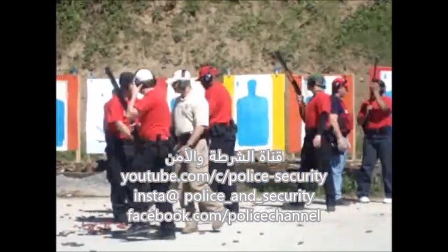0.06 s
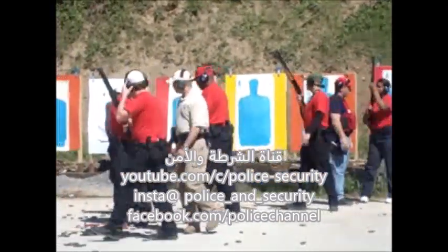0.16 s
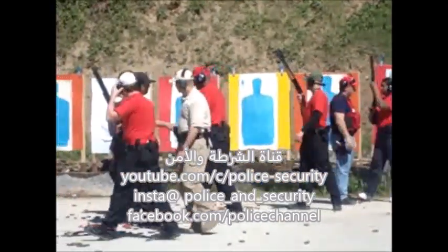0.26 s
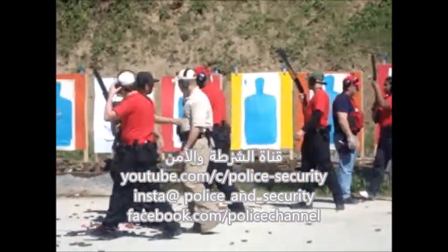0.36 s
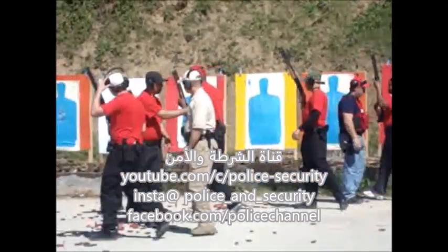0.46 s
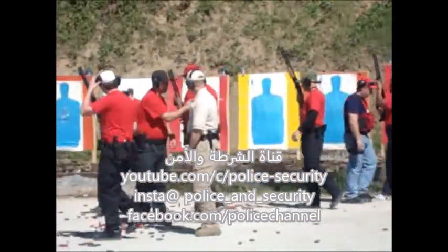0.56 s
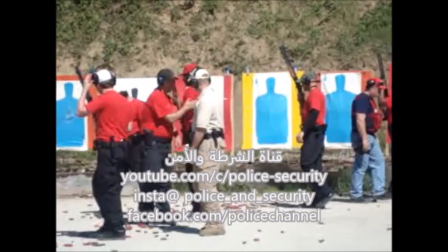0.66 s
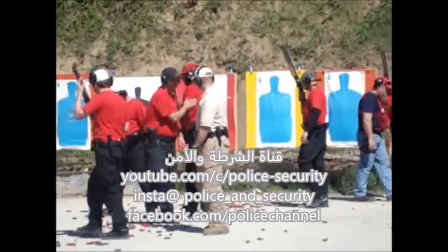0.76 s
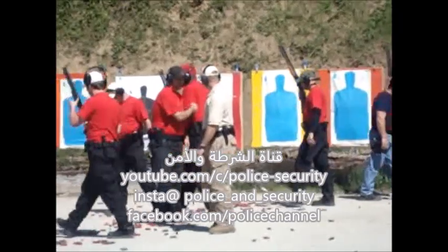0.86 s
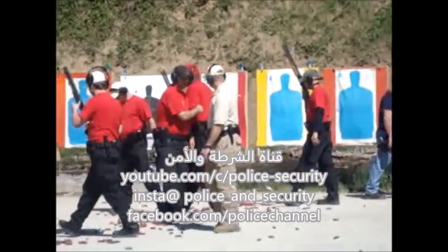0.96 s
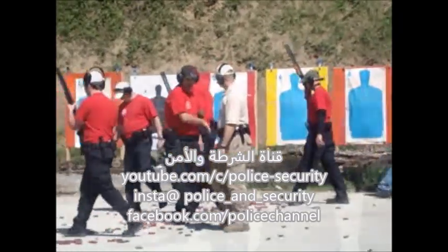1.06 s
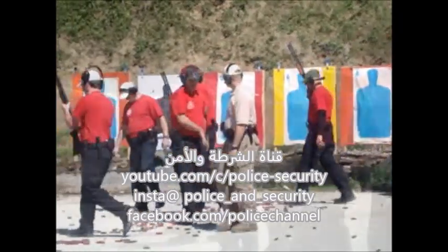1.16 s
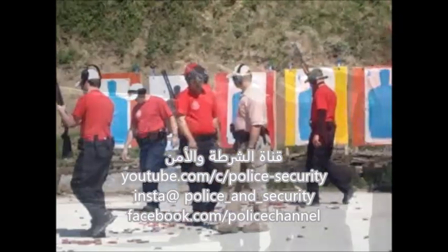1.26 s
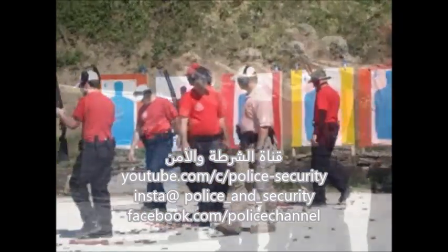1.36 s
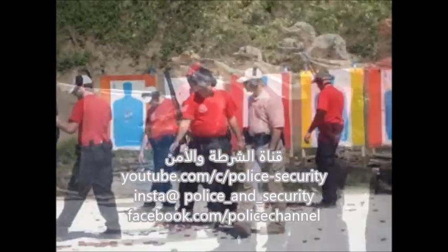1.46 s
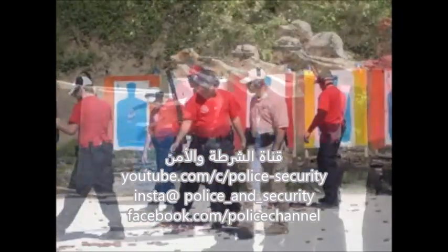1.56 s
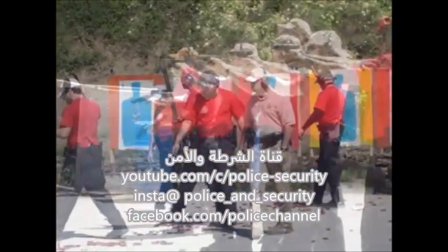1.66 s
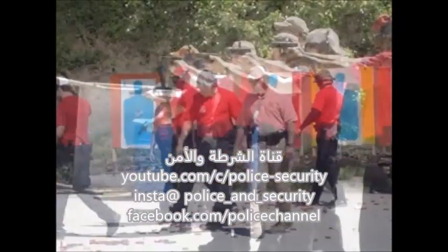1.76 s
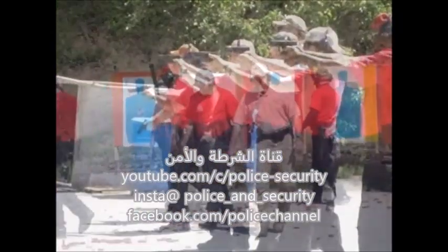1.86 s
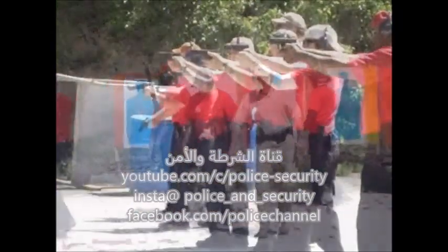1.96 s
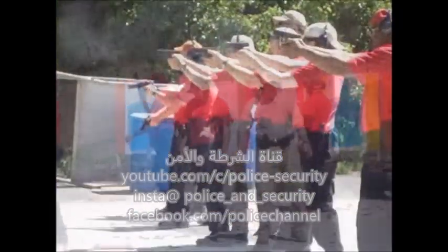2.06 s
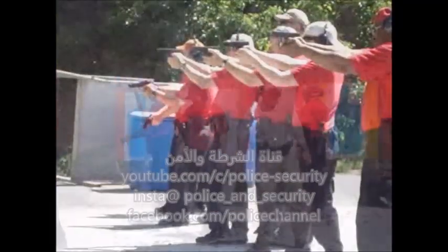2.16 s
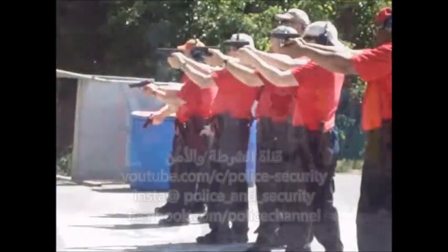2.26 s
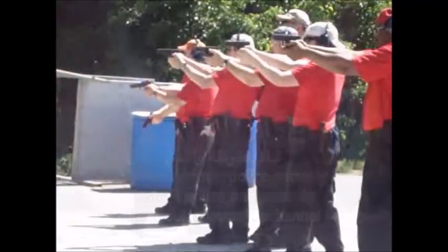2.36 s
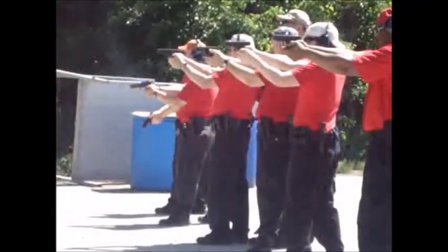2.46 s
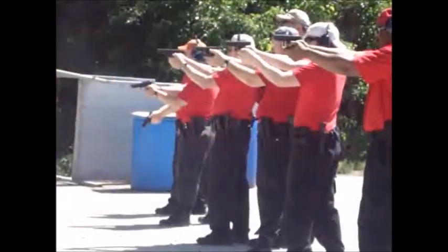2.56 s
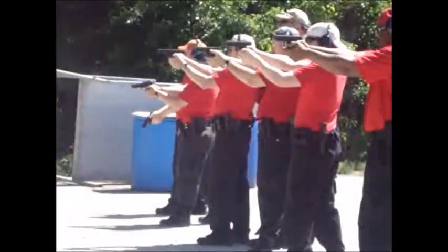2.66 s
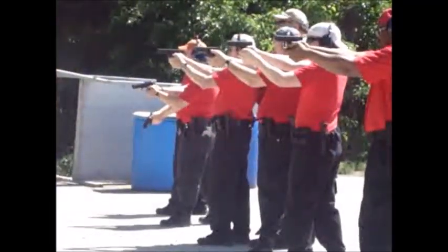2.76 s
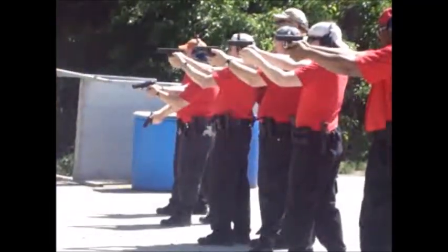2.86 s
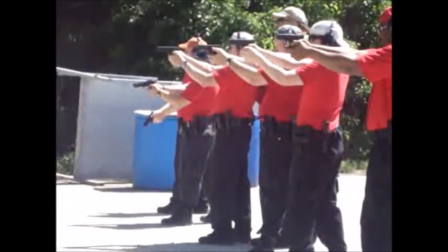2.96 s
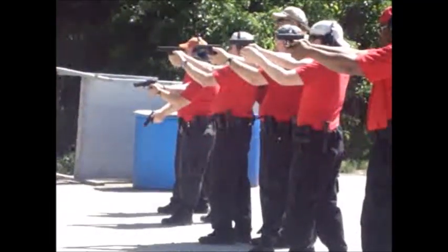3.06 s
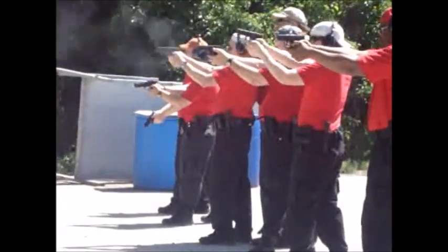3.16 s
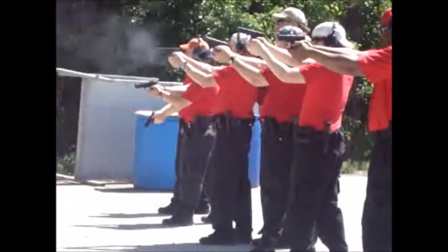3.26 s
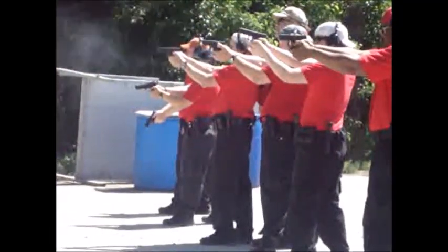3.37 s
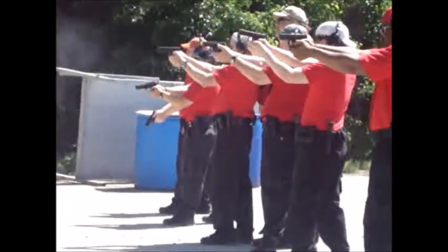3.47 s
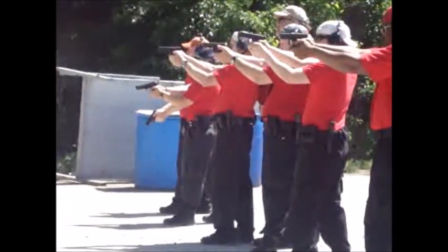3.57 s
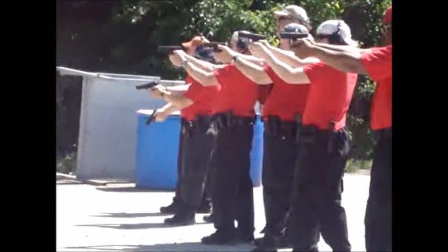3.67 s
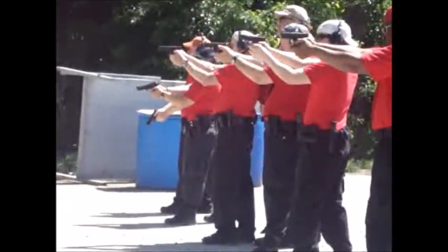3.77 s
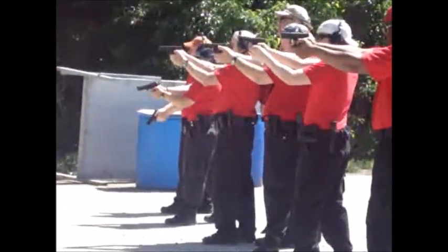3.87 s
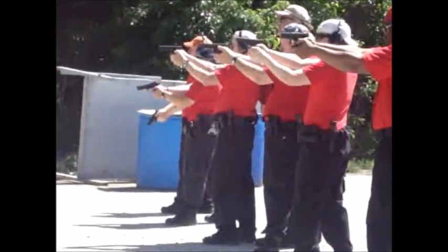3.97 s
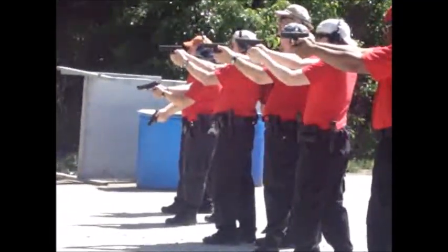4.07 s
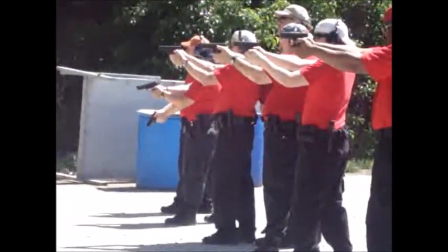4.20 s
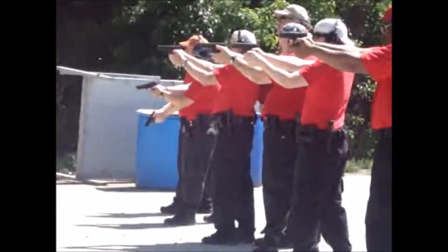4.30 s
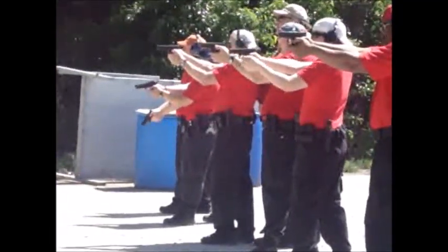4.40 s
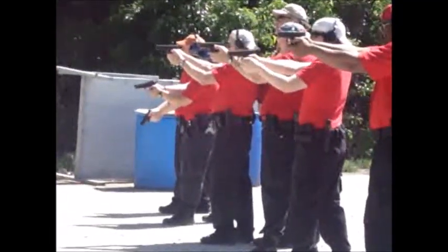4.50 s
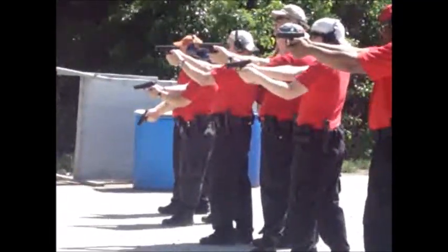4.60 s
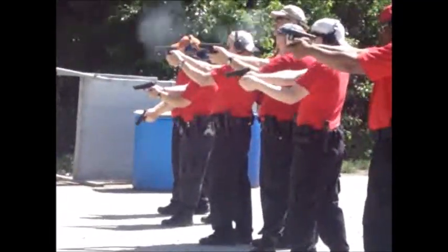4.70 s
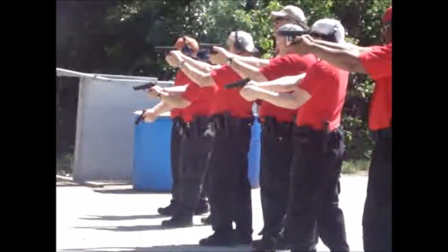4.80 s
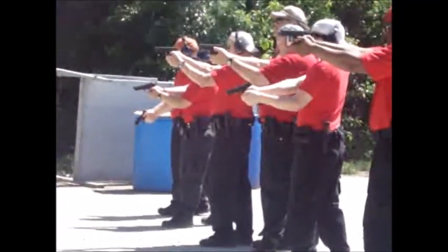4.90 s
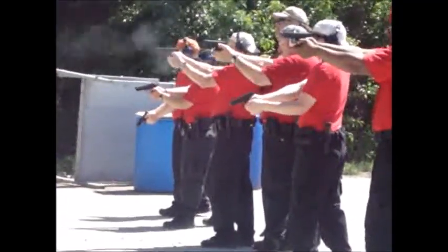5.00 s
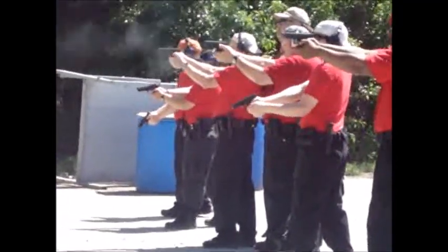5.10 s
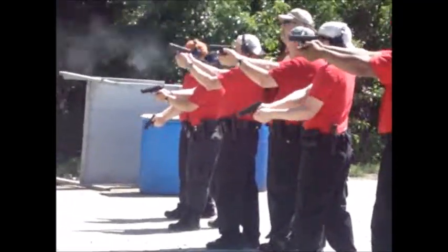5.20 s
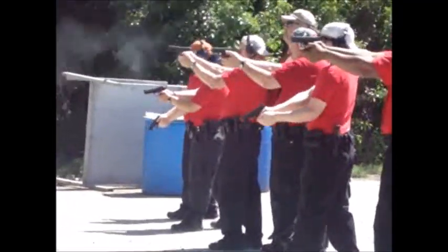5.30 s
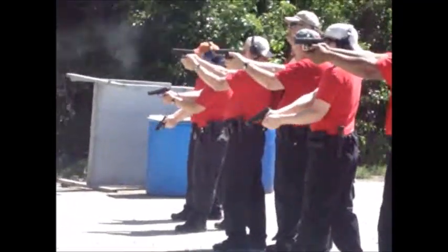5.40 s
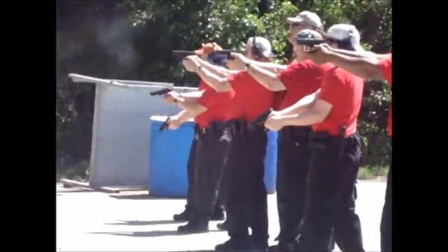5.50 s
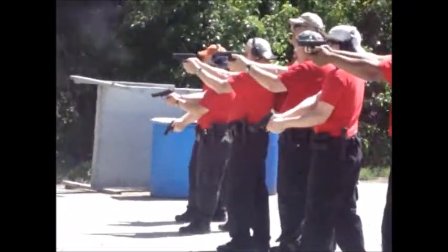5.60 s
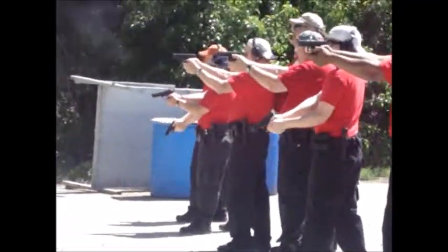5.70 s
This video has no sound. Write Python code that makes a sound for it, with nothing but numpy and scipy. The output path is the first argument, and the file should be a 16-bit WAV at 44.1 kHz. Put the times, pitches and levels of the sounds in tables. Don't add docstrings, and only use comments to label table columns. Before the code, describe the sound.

An outdoor shooting range heard through a small camera microphone. Metal clinks and dull knocks sit over steady traffic wash, with one far pistol shot swelling into echo. A loud shot lands just before the place changes to a quieter firing line, where a quick pair and later three spaced shots crack, slap off walls and trail away. A faint distant horn sounds between them.

```python
import sys
import numpy as np
from scipy import signal
from scipy.fft import dct
from scipy.io import wavfile
from scipy.ndimage import uniform_filter1d

SR = 44100
rng = np.random.default_rng(int(sys.argv[2]) if len(sys.argv) > 2 else 0)


def field_ratio(decibels):
    return 10 ** (np.asarray(decibels, dtype=float) / 20)


def dump_mix(stems):
    frames = np.atleast_2d(stems).T
    limited = np.clip(frames, -1, 1)
    pcm = np.round(limited * 32767).astype(np.int16)
    wavfile.write(sys.argv[1], SR, pcm)


N = 253342
CUT_S = 2.46
EDGE_HZ = 10040


def evened(x):
    return x / np.sqrt(np.mean(abs(x) ** 2) + 1e-20)


def read(points, hz):
    f, value = np.transpose(points)
    return np.interp(np.log(hz + 1), np.log(f + 1), value)


def add(mix, s, sound):
    part = mix[round(s * SR):][:len(sound)]
    part += sound[:len(part)]


def resonate(x, hz, width):
    turn = np.exp(2j * np.pi * np.cumsum(hz * np.ones(len(x))) / SR)
    r = np.exp(-np.pi * width / SR)
    return 2 * (turn * signal.lfilter([1 - r], [1, -r], x / turn + 1e-18)).real


# (time [s], peak level [dB], level of both wall slaps [dB], far-wall delay [s])
SHOTS = [
    (2.0954, -2, -1, .0376),
    (3.1531, -1, 0, .0406),
    (3.2734, 0, 0, .0391),
    (4.7744, -2, -1, .0427),
    (5.0268, -2, 0, .0391),
    (5.2482, 0, -4, .0378),
]
# (time [s], peak level [dB])
STRAYS = [
    (2.1555, -3),
    (3.2046, -4),
    (4.7870, -4),
    (4.8511, -6),
    (5.0905, -8),
]
# (level [dB], pressure step [ms], ground bounce [dB], limiter pull [dB])
DIRECT, NEAR_SLAP = (0, .065, -3, 3), (1, .14, -4, 12)
FAR_SLAP, STRAY_SLAP = (1, .1, -5, 7), (0, .12, -5, 10)


def arrivals():
    near_wall_s, pull_per_db = .0216, 0.72
    cracks = [(s, db, STRAY_SLAP) for s, db in STRAYS]
    for s, db, slap_db, far_wall_s in SHOTS:
        cracks.append((s, db, DIRECT))
        cracks.append((s + near_wall_s, slap_db, NEAR_SLAP))
        cracks.append((s + far_wall_s, slap_db, FAR_SLAP))
    rows = []
    for s, db, (own_db, ms, bounce_db, pull_db) in cracks:
        rows.append((s, db + own_db, ms, bounce_db, pull_db + pull_per_db * db))
    return rows


# (frequency [Hz], width [Hz], level [dB])
MIC_BODY = [
    (860, 320, 8),
    (1900, 1200, 5),
    (5000, 4000, -5),
]


def blast(db, ms, bounce_db):
    u = np.arange(600) / SR / (ms * 0.00091)
    step = -(1 - u) * np.exp(-u) * np.minimum(2 * u, 1)
    slow = np.exp(-u / 2)
    step -= step.sum() * slow / slow.sum()
    heard = .5 * step + sum(field_ratio(g) * resonate(step, f, w) for f, w, g in MIC_BODY)
    dull = uniform_filter1d(heard[:400], size=8)
    for delay_s, loss_db in (.0012, 0), (.0035, -3):
        add(heard, delay_s, field_ratio(bounce_db + loss_db) * dull)
    heard = signal.lfilter(*signal.butter(2, 80, "high", fs=SR), heard)
    return field_ratio(db + 2.5) * heard / abs(heard).max()


def ducking():
    loss_db, t = np.zeros(N), np.arange(2000) / SR
    for s, *_, db in arrivals():
        add(loss_db, s + .0008, db * np.exp(-(t / .009) ** 2))
    return field_ratio(-uniform_filter1d(loss_db, size=30))


# (time after the shot [s], level [dB])
WALL_SPRAY = [
    (.0226, 8),
    (.0405, 8),
]


def banks_db(t, near):
    spray = sum(db * (t > s) * np.exp(-((t - s) / 0.0091) ** 2) for s, db in WALL_SPRAY)
    spray = spray * np.clip(near * 8, 0, 0.75)
    return 6.5 + spray - 13 * np.maximum(t - 0.32, 0)


# (time [s], level [dB], nearness [0-1], bite near 3.5 kHz [dB], ring-time factor [1])
TAILS = [
    (1.071, -13.5, 0, 5.5, 0.95),
    (2.094, -17, .17, 0.1, 1.203),
    (3.152, -19, 0.97, -0.5, 1.06),
    (3.273, -25.5, 1, 1.5, 1.355),
    (4.773, -19.5, 0.96, 0.5, 1.2),
    (4.905, -33.5, .17, -3.5, 0.56),
    (5.026, -22, 0.7, -0.2, 1.15),
    (5.247, -24.5, 0.96, 4.5, 1.204),
]
# (frequency [Hz], density [dB per Hz])
TAIL_COLOUR = [(18, -72), (30, -50), (202, -34), (239, -24), (291, -18.5), (606, -1.5), (668, -3),
               (833, -1.5), (1170, -3.5), (1460, -13.5), (1960, -14), (2900, -14), (5210, -13), (9590, -23),
               (10300, -30.5), (13400, -71.5), (22000, -120)]
# (frequency [Hz], 60 dB decay [s])
RING = [(60, .5), (200, 0.57), (800, 1.04), (2000, 1.005), (4000, 0.82), (8000, 0.67)]


def tail(db, near, bite_db, ring):
    hz, t = np.fft.rfftfreq(512, 1 / SR)[:, None], np.arange(520) * 128 / SR
    a, b, clumps = rng.standard_normal((520, 257, 3)).T
    clumps = evened(uniform_filter1d(uniform_filter1d(clumps, size=16, axis=0), size=2, axis=1))
    rise_s = .0035 + 0.045 * np.exp(-near / 0.082)
    treble_db = 1.5 + 2 * near
    thump_db = -15 + 30 * near
    tone_db = treble_db * np.clip(np.log2(hz / 1300 + .01), 0, 1)
    tone_db = tone_db + thump_db * (hz < 260) * np.exp(-t / .05)
    tone_db += bite_db * np.exp(-np.log2(hz / 3600 + .01) ** 2 / .4)
    decay_db = 60 * t / (ring * read(RING, hz))
    colour = evened(field_ratio(read(TAIL_COLOUR, hz)))
    z = (a + 1j * b) * colour * field_ratio(tone_db - decay_db + 2.06 * clumps)
    x = signal.istft(z, nperseg=512, noverlap=384)[1]
    x = signal.lfilter(*signal.butter(2, 65, "high", fs=SR), x)
    t = np.arange(len(x)) / SR
    start = np.minimum(t / rise_s, 1) ** 0.59
    return field_ratio(db + banks_db(t, near)) * start * x / np.sqrt(np.mean(x[:2000] ** 2))


# (time [s], peak level [dB], frequency [Hz], 60 dB decay [s])
CLINKS = [(0.0054, -24.5, 4550, 0.02), (0.045, -37, 4300, 0.02), (0.0857, -47, 4500, 0.02),
          (0.558, -30.5, 5830, 0.029), (1.0535, -21, 6200, 0.025), (1.0598, -13.5, 4700, 0.014),
          (1.712, -27, 4060, 0.032), (1.7918, -38, 6000, 0.02), (1.8135, -32, 4400, 0.052),
          (1.8512, -24.5, 4300, 0.018), (1.8584, -30, 4220, 0.024), (1.8826, -35, 4450, 0.02),
          (1.9096, -24.5, 4450, 0.014), (1.9174, -37, 5800, 0.02), (1.9517, -33, 4500, 0.025),
          (4.2033, -29, 5470, 0.011), (4.2244, -46, 3950, 0.02), (4.3216, -42, 4800, 0.016),
          (4.3485, -41, 4040, 0.02)]


def clink(db, hz, t60):
    t = np.arange(3000) / SR
    scrape = rng.standard_normal(3000) * np.exp(-t / 0.0019)
    modes = ((1.001, 21.5), (1.12, 1), (1.37, 11), (1.55, -19), (1.85, -21))  # (ratio, dB)
    ring = sum(field_ratio(g) * evened(resonate(scrape, hz * k, 4.7 / t60)) for k, g in modes)
    ring += 1.2 * evened(resonate(scrape, 5500, 3000))
    return field_ratio(db) * ring / abs(ring).max()


# (time [s], peak level [dB], frequency [Hz], 60 dB decay [s])
KNOCKS = [
    (0.549, -22, 820, 0.051),
    (1.803, -20.5, 740, 0.017),
    (1.871, -17, 750, 0.034),
    (1.889, -43, 696, 0.03),
    (3.951, -32, 611, 0.03),
    (4.018, -35, 748, 0.025),
]


def knock(db, hz, t60):
    blow = rng.standard_normal(3000) * np.exp(-np.arange(3000) / SR / 0.0018)
    ring = resonate(resonate(blow, hz, 7.1 / t60), hz, 500)
    return field_ratio(db) * ring / abs(ring).max()


# (time [s], length [s], start frequency [Hz], end frequency [Hz], top level [dB])
ROLLS = [
    (1.905, .15, 8200, 7900, -50),
    (4.5, .24, 7950, 8050, -61),
    (0, .13, 4450, 4430, -48),
    (1.85, .1, 4300, 4200, -43),
]


def roll(length, start_hz, end_hz, db):
    t = np.arange(0, 1, 1 / (length * SR))
    hz = start_hz + (end_hz - start_hz) * t
    arch_db = np.interp(t, [0, 0.26, 1], [-14, 0, -14])
    noise = rng.standard_normal(SR)[:len(t)]
    return field_ratio(db + arch_db) * evened(resonate(resonate(noise, hz, 250), hz, 250))


# (time [s], length [s], level [dB])
HORN = [
    (2.929, .3, -42.5),
    (4.05, .8, -43),
]


def horn(start, length, db):
    release_s = .1
    t = np.arange(0, length + release_s, 1 / SR)
    release = np.clip((length + release_s - t) / release_s, 0, 1)
    swell = np.minimum(t / 0.56, 1) ** 0.85 * release
    octave = field_ratio(-4) * np.clip((t - 0.32) / .2, 0, 1)
    turns = 2 * np.pi * 398 * t
    waver = field_ratio(evened(uniform_filter1d(rng.standard_normal(SR), size=2000)))[:len(t)]
    return np.sqrt(2) * waver * field_ratio(db) * swell * (np.sin(turns) + octave * np.sin(2 * turns))


# (frequency [Hz], level [dB], start [s], end [s])
HUM = [
    (167, -69, 2.55, 3.2),
    (167, -73, 4.0, 4.8),
    (195, -59, 0, 2.45),
]


def hum(hz, db, start, end):
    noise = rng.standard_normal(3 * SR)[:round((end - start) * SR)]
    line = evened(resonate(resonate(noise, hz, 12), hz, 12))
    return start, field_ratio(db) * line * signal.windows.tukey(len(noise), .15)


def wash(colour, times, level_db, patchy_db):
    frames, hz = N // 256 + 5, np.fft.rfftfreq(1024, 1 / SR)
    a, b, patches = rng.standard_normal((frames, 513, 3)).T
    patches = evened(uniform_filter1d(uniform_filter1d(patches, size=9, axis=0), size=12, axis=1))
    z = (a + 1j * b) * field_ratio(read(colour, hz)[:, None] + patchy_db * patches)
    level = field_ratio(np.interp(np.arange(N) / SR, times, level_db))
    return level * evened(signal.istft(z, nperseg=1024, noverlap=768)[1][:N])


def since_shot():
    t = np.arange(0, 6, .005)
    shots = np.array([0] + [row[0] for row in SHOTS])
    return t, t - shots[np.searchsorted(shots, t, "right") - 1]


# (frequency [Hz], density [dB per Hz])
ROAD = [(15, -65), (25, -44), (86, -23.5), (113, -13.5), (165, -14), (188, -11), (288, -13), (514, -8.5),
        (851, -1), (1150, -7.5), (2580, -26), (6080, -32), (6720, -35.5), (9570, -39), (10300, -38),
        (13400, -67), (22000, -120)]
# (time [s], level [dB])
ROAD_DB = [(0, -33.5), (1.0, -35), (1.6, -33), (2.2, -32.5), (2.455, -40)]


def road():
    t, _ = since_shot()
    level_db = np.interp(t, *np.transpose(ROAD_DB)) - 60 * (t > CUT_S)
    return wash(ROAD, t, level_db, patchy_db=0.5)


# (frequency [Hz], density [dB per Hz])
FIELD = [(150, -51), (250, -44.5), (347, -11.5), (438, -5), (528, -7.5), (732, -3), (1150, -8), (1980, -18),
         (3580, -23.5), (4670, -25.5), (10300, -31.5), (13400, -57), (22000, -120)]


def field():
    t, since = since_shot()
    level_db = -47.5 + 2.5 * since + 7.5 * np.exp(-since / 0.29)
    level_db -= 0.5 * np.maximum(1 - (t - CUT_S) / 0.15, 0)
    return wash(FIELD, t, level_db, patchy_db=.8)


# (frequency [Hz], density [dB per Hz])
RUMBLE = [(15, -47), (25, -29.5), (108, -1.5), (135, -11), (162, -2), (194, -8.5), (300, 2.5), (390, -27),
          (660, -120)]


def rumble():
    t, since = since_shot()
    level_db = -77.5 + 15 * since - 60 * (t < CUT_S + 0.089)
    return wash(RUMBLE, t, level_db, patchy_db=5.0)


def scene():
    mix = road() + rumble() + field()
    for s, *row in TAILS:
        add(mix, s, tail(*row))
    mix *= ducking()
    for s, *row, _ in arrivals():
        add(mix, s, blast(*row))
    for rows, source in (CLINKS, clink), (KNOCKS, knock), (ROLLS, roll):
        for s, *row in rows:
            add(mix, s, source(*row))
    for row in HORN:
        add(mix, row[0], horn(*row))
    for row in HUM:
        add(mix, *hum(*row))
    return mix[None]


# (attack time [s], lowest frequency lost [Hz], loss [dB])
BRACES = [
    (1.0514, 5300, 18),
    (2.0, 5000, 24),
    (3.1515, 2000, 35),
    (4.2033, 4200, 12),
    (4.7725, 1500, 20),
    (5.0268, 6000, 19),
    (5.2482, 4500, 22),
]


def starved():
    lead_s, brace_s = .004, .019
    ahead = [(s - lead_s - brace_s, s - lead_s, hz, db) for s, hz, db in BRACES]
    behind = [(s + .004, s + .012, 5000, 9) for s, db, *_ in arrivals() if db > 0]
    return ahead + behind


def treble_dropouts(x):
    hz, t, z = signal.stft(x, SR, nperseg=256, noverlap=192)
    dice = rng.random((len(t) // 5 + 1, 33)).T.repeat(4, 0).repeat(5, 1)[:len(hz), :len(t)]
    z /= field_ratio(13 * (dice < .13 * np.clip(hz[:, None] / 3500 - 1, 0, 2)))
    for start, end, lo_hz, loss_db in starved():
        kept = .13 * (loss_db < 18)
        lost = rng.random(65).repeat(2)[:len(hz)] > kept
        change_db = np.where(lost, -loss_db, 3) * (hz > lo_hz)
        z[:, (t > start) & (t < end)] *= field_ratio(change_db)[:, None]
    return signal.istft(z, SR, nperseg=256, noverlap=192)[1][:N]


# (centre [s], length [s], lowest frequency thinned [Hz])
DROUGHTS = [(.028, .035, 2000), (.085, .04, 2000), (.343, .035, 2000), (.373, .035, 2500),
            (.575, .04, 4500), (1.132, .055, 5000), (1.888, .045, 2500), (2.037, .04, 3000),
            (2.137, .04, 2500), (2.315, .035, 5000), (2.53, .075, 1200), (2.71, .04, 1500),
            (2.838, .035, 2000), (3.22, .035, 5000), (3.396, .04, 1200), (3.785, .04, 3000),
            (3.863, .035, 2000), (4.108, .035, 3000), (4.297, .045, 1500), (4.702, .035, 1500),
            (4.742, .03, 1500), (4.848, .045, 1500), (4.92, .035, 5000), (5.27, .04, 1500)]


def run_dry(x):
    out = x.copy()
    for centre, block_s, lo_hz in DROUGHTS:
        first, size = round((centre - block_s / 2) * SR), round(block_s * SR)
        window = np.sin(np.pi * np.arange(size) / size)
        lines = dct(x[first:first + size] * window, norm="ortho")
        hz = np.arange(size) * SR / 2 / size
        local = (uniform_filter1d(abs(lines), size=81) + 1e-9) ** .65
        thinned = (hz > lo_hz) & (hz < EDGE_HZ)
        step = 2 * local * np.quantile(abs(lines / local)[thinned], 1 - .065)
        change = (np.round(lines / step) * step - lines) * (hz > lo_hz)
        add(out, first / SR, window * dct(change, type=3, norm="ortho"))
    return out


def roll_off(x):
    return signal.sosfilt(signal.butter(12, 10470, fs=SR, output="sos"), x)


def record(dry):
    power_db = 10 * np.log10(abs(uniform_filter1d(dry[0] ** 2, size=60)) + 1e-12)
    fall = np.arange(N) * 1200.0 / SR
    over_db = np.maximum(np.maximum.accumulate(power_db + fall) - fall + 14.5, 0)
    late_db = np.roll(uniform_filter1d(over_db, size=60), shift=130)
    x = np.clip(dry[0] / field_ratio(0.48 * late_db), -1, 1)
    x = run_dry(treble_dropouts(x))
    x = signal.oaconvolve(x, signal.firwin(401, EDGE_HZ, window=("kaiser", 8), fs=SR), "same")
    x = np.clip(x, -.92, .92)
    return roll_off(x[None])


dry = scene()
out = record(dry)
dump_mix(out)
```